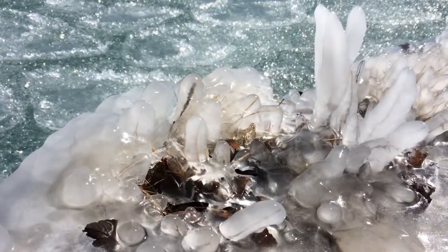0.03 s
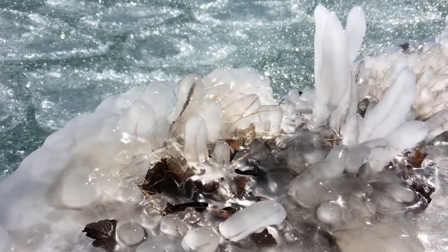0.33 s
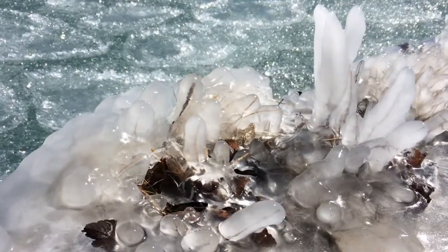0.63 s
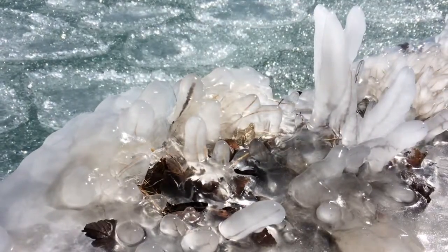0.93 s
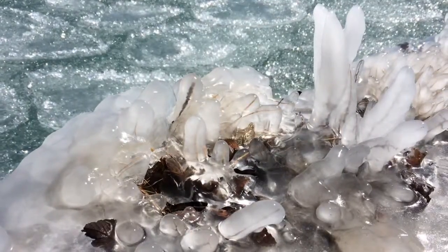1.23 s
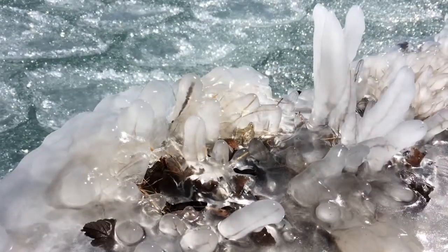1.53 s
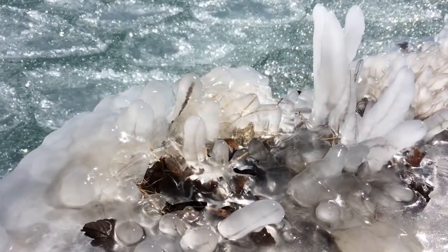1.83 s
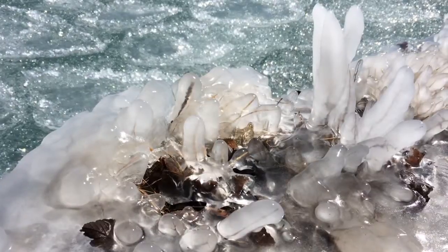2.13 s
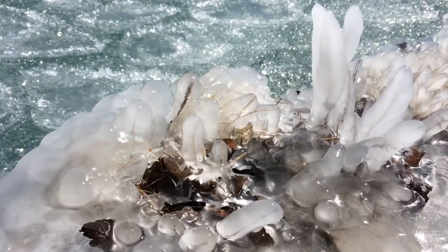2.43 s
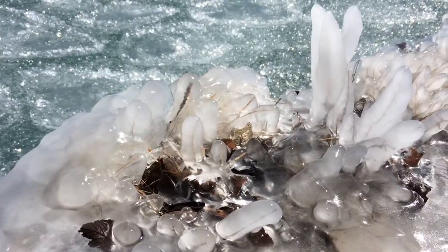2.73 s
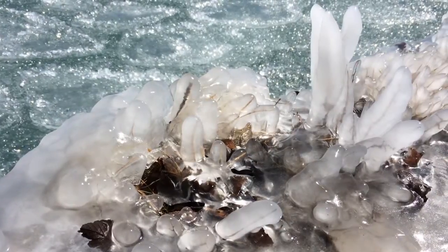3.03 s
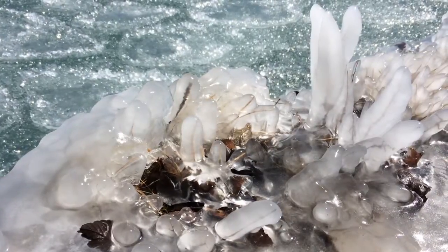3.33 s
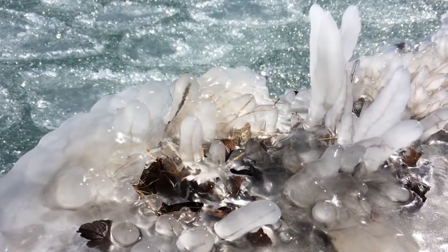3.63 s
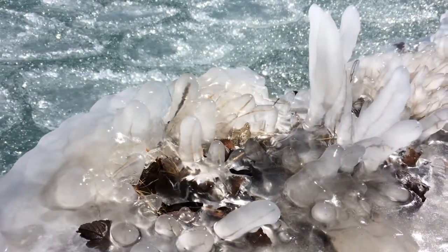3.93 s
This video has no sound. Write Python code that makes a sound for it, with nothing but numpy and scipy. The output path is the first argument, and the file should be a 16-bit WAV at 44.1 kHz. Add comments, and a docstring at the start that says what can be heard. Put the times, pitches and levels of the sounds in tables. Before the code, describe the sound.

A far-off engine hums across an icy lake, starting with a short exhaust rasp and sinking slightly as it weakens. Low wind rumble continues throughout, while slush by the shore hisses softly and ice splinters tick faintly.

```python
"""An icy lake shore. A distant engine drones: its periodic firing gives a harmonic series that sinks
as the engine slows. At first the firings ring the exhaust with a rasp; then the tones fade into low
rumble and the far roar of wind and open water. Small waves stir the floating ice, so a soft fizzing
hiss swells and ebbs while bubbles ping and splinters tick. One faint high whistle passes."""
import sys
import numpy as np
from scipy import signal
from scipy.fft import rfft, irfft
from scipy.io import wavfile
from scipy.ndimage import map_coordinates

SR = 44100
rng = np.random.default_rng(int(sys.argv[2]) if len(sys.argv) > 2 else 0)


def output_pcm(signal):
    """Save a mono or channel-first signal as 16-bit PCM at the path in sys.argv[1].

    Samples are clipped to [-1, 1] before scaling.
    """
    pcm = np.clip(np.atleast_2d(signal).T, -1, 1) * 32767
    wavfile.write(sys.argv[1], SR, np.round(pcm).astype(np.int16))


N = 176400

# Spectrum of far wind and open water: frequency_hz, relative_density_db
ROAR_SPECTRUM = [(200, -38), (450, -6), (660, -2), (780, -1), (950, -1.5), (1100, -4), (1550, -5),
                 (2000, -11), (2700, -19), (4000, -28), (8000, -37), (15000, -40.5)]
# Envelope of the hollow band in the roar: time_s, level_db
HOLLOW_ENVELOPE = [(0, -65.5), (1.2, -56), (1.55, -68), (1.85, -52.5), (2.15, -58.5), (2.5, -52),
                   (2.8, -72), (3.1, -69), (3.35, -61.5), (3.7, -54), (4, -62)]
# Spectrum of the deep rumble: frequency_hz, relative_density_db
RUMBLE_SPECTRUM = [(15, -37), (28, -11), (42, -12), (60, -0.5), (85, -1), (125, 1.5), (155, -5.5),
                   (210, -7.5), (290, -19), (400, -32.5), (650, -38.5)]
# Gusts of the rumble: time_s, level_db
RUMBLE_ENVELOPE = [(0, -35), (.25, -35), (.7, -36.5), (1.2, -36), (1.6, -37.5), (2.1, -37.5), (2.4, -33.5),
                   (2.58, -37.5), (2.75, -37.5), (2.9, -35.5), (3.05, -38), (3.4, -38), (3.85, -35.5),
                   (4, -40.5)]
# Spectrum of the murmur just above the rumble: frequency_hz, relative_density_db
MURMUR_SPECTRUM = [(130, -5), (200, -1), (280, 0.5), (400, -3), (520, -6.5), (650, -18), (900, -34)]
# Envelope of that murmur: time_s, level_db
MURMUR_ENVELOPE = [(0, -39), (.5, -46.5), (1.2, -46.5), (2, -45.5), (2.5, -45), (2.8, -47.5), (3.2, -42),
                   (3.6, -45), (3.8, -48.5), (4, -43)]
# Arch of the whistle: time_s, pitch_hz, level_db
WHISTLE_ARCH = [(.53, 8200, -83), (.6, 9400, -74), (.68, 9400, -74), (.76, 8550, -75), (.8, 8000, -90)]
# Spectrum of the wash in the floating ice: frequency_hz, relative_density_db
WASH_SPECTRUM = [(1500, -4), (3000, -4), (3700, -1), (4500, -5.5), (6000, -3), (8500, -6.5), (11000, -10.5),
                 (15000, -14)]
# Swell shared by fizz, hiss and bubbles: time_s, base_level_db
WASH_ENVELOPE = [(0, -73), (.55, -74.5), (.93, -68.5), (1, -66.5), (1.24, -64), (1.38, -66.5), (1.7, -67),
                 (1.9, -64), (2.12, -68), (2.45, -66), (2.65, -67), (2.9, -66), (3.25, -65.5), (3.45, -71),
                 (3.8, -71.5), (4, -68)]
# Contacts of ice splinters: start_s, peak_db, pitch_hz, width_hz, t60_s
ICE_CONTACTS = [(.1206, -61, 13300, 1500, .02), (.1635, -46.5, 10800, 8000, .007),
                (.7944, -59, 10200, 1200, .04), (1.1794, -55, 8500, 900, .03),
                (1.2955, -60, 9400, 1000, .03), (1.3423, -62, 12200, 1000, .03),
                (1.48, -52, 9840, 1600, 0.02), (1.5983, -58, 9900, 900, .04),
                (1.6297, -58, 10200, 1400, .02), (1.8178, -57, 10000, 1100, .03),
                (2.2164, -54, 9000, 4000, .02), (2.4174, -55, 6000, 2500, .025),
                (2.464, -51, 8700, 2800, .02), (2.8434, -53, 8700, 1300, 0.041)]
# Resonances of the exhaust pipe: frequency_hz, width_hz, gain_db
EXHAUST_MODES = [(485, 91, -5), (737, 140, -3.5), (838, 230, 5), (1135, 160, -7.5), (1530, 360, -23)]
# Envelope of the exhaust rasp: time_s, level_db
RASP_ENVELOPE = [(0, -43.5), (.06, -35.5), (.11, -40.5), (.2, -46.5), (.255, -45.5), (.29, -68), (1.1, -55),
                 (1.5, -68), (2, -60), (2.8, -70), (3.4, -56), (4, -77)]
# Levels of the four firing harmonics: time_s, first_db, second_db, third_db, fourth_db
HARMONIC_ENVELOPES = [(0, -32, -40.5, -42, -36), (.2, -34, -38.5, -41, -39), (.5, -35, -40.5, -49, -46.5),
                      (.75, -31.5, -41, -46, -44), (1.05, -45.5, -39.5, -44.5, -45.5),
                      (1.35, -39.5, -42.5, -47, -52), (1.65, -39, -48.5, -46.5, -51.5),
                      (2, -40.5, -63, -47, -51), (2.4, -41, -57, -48, -52), (2.9, -38.5, -58, -52.5, -58),
                      (3.2, -43.5, -61, -49.5, -58), (3.6, -39, -58, -54, -59), (4, -44, -57, -62.5, -56)]
# Weaker engine partials, the lowest beating with the fundamental: firing_rate_ratio, initial_level_db
WEAK_PARTIALS = [(.91, -42.5), (1.5, -47.5), (2.5, -57), (3.5, -56.5), (5, -64), (6, -67), (7, -60.5)]

TIME_S = np.arange(N) / SR


def undb(db):
    """Convert decibels to an amplitude ratio."""
    return 10 ** (np.asarray(db) / 20)


def unit(x):
    """Normalise to rms 1."""
    return x / np.sqrt(np.mean(x ** 2))


def curve(table, column=1):
    """Interpolate one column of a table linearly in time."""
    rows = np.array(table)
    return np.interp(TIME_S, rows[:, 0], rows[:, column])


def colour(x, spectrum):
    """Spectral shaping: weight each frequency by a table, then normalise to rms 1."""
    hz, db = np.array(spectrum).T
    bins_hz = np.maximum(np.fft.rfftfreq(N, 1 / SR), 1)
    gain_db = np.interp(np.log(bins_hz), np.log(hz), db, left=-90, right=-90)
    return unit(irfft(rfft(x) * undb(gain_db), N))


def resonate(x, hz, width_hz):
    """Resonance with steep skirts: two equal band-passes in cascade."""
    b, a = signal.iirpeak(min(hz, SR / 2 - 1000), hz / width_hz, fs=SR)
    return signal.lfilter(b, a, signal.lfilter(b, a, x))


def noise():
    """Gaussian white noise."""
    return rng.standard_normal(N)


def drift(knots_per_s):
    """Smooth random modulation with a spread near 1."""
    return map_coordinates(rng.standard_normal(2000), [TIME_S * knots_per_s], mode="mirror")


def far_roar(level_db=-52.5, sway_db=0.96, flicker_db=0.5):
    """Broadband noise of far wind and open water; a narrow, hollow band comes and goes."""
    hollow = unit(resonate(noise(), hz=878, width_hz=193))
    hollow *= undb(curve(HOLLOW_ENVELOPE) + flicker_db * drift(16))
    return colour(noise(), ROAR_SPECTRUM) * undb(level_db + sway_db * drift(5.33)) + hollow


def rumble(throb_db=0.03, sway_db=1.2):
    """Amplitude-modulated low noise: a deep band in soft gusts, and a murmur above it."""
    deep = colour(noise(), RUMBLE_SPECTRUM) * undb(curve(RUMBLE_ENVELOPE) + throb_db * drift(22))
    murmur = colour(noise(), MURMUR_SPECTRUM) * undb(curve(MURMUR_ENVELOPE) + sway_db * drift(14))
    return deep + murmur


def whistle(waver_hz=240):
    """Random frequency modulation roughens a thin arching tone, perhaps a far bird."""
    pitch_hz = curve(WHISTLE_ARCH) + waver_hz * drift(300)
    phase = 2 * np.pi * np.cumsum(pitch_hz) / SR
    sounding = (TIME_S > WHISTLE_ARCH[0][0]) & (TIME_S < WHISTLE_ARCH[-1][0])
    return np.sin(phase) * undb(curve(WHISTLE_ARCH, column=2)) * sounding


def wash(grains_per_s=970, spread_db=7.5, fizz_db=-7, hiss_db=-0.5, slosh_db=-65.5, flicker_db=1.34):
    """Shot noise: waves stir the slush into tiny random crackles, over a hiss and one lower slosh."""
    grains = (rng.random(N) < grains_per_s / SR) * rng.choice([-1, 1], N)
    grain_gain = undb(spread_db * np.minimum(rng.exponential(size=N), 4))
    fizz = undb(fizz_db) * colour(grains * grain_gain, WASH_SPECTRUM)
    hiss = undb(hiss_db) * colour(noise(), WASH_SPECTRUM)
    slosh = undb(slosh_db) * unit(resonate(noise(), hz=3500, width_hz=1350))
    slosh *= np.exp(-((TIME_S - 1.154) / 0.21) ** 2)  # a brief swell peaking at 1.154 s
    return ((fizz + hiss) * undb(curve(WASH_ENVELOPE)) + slosh) * undb(flicker_db * drift(29.93))


def bubbles(count=260, low_hz=3360, high_hz=10920, t60_s=0.032, rise_per_s=1.7,
            gain_db=-1, spread_db=3, tilt_db_per_octave=-2):
    """Damped oscillation: bubbles ping at random, rising in pitch, louder as the wash swells."""
    age_s = np.arange(2048) / SR
    decay = np.exp(-np.log(1000) * age_s / t60_s)
    out = np.zeros(N + len(age_s))
    for when, pitch, strength in rng.random((count, 3)):
        hz = low_hz * (high_hz / low_hz) ** pitch
        ping = np.sin(2 * np.pi * hz * age_s * (1 + rise_per_s * age_s / 2)) * decay
        strength_db = spread_db * min(-np.log(1 - strength), 3)
        tilt_db = tilt_db_per_octave * np.log2(hz / low_hz)
        start = int(when * N)
        out[start:start + len(age_s)] += ping * undb(strength_db + tilt_db)
    return out[:N] * undb(curve(WASH_ENVELOPE) + gain_db)


def ice_ticks():
    """Impact excitation: splinters of ice touch, and each short burst rings one resonance."""
    age_s = np.arange(4096) / SR
    out = np.zeros(N)
    for start_s, peak_db, pitch_hz, width_hz, t60_s in ICE_CONTACTS:
        burst = rng.standard_normal(len(age_s)) * np.exp(-np.log(1000) * age_s / t60_s)
        tick = resonate(burst, pitch_hz, width_hz)
        start = int(start_s * SR)
        out[start:start + len(age_s)] += undb(peak_db) * tick / np.abs(tick).max()
    return out


def exhaust_rasp(cycles, jitter_s=0.00026, scatter_db=2.5, gas_db=-6, puff_cycles=0.93, muffler_hz=1800):
    """Source and filter: uneven firings and their gas puffs ring the pipe; a muffler cuts the treble."""
    firings = np.flatnonzero(np.diff(np.floor(cycles)))
    timing, strength = rng.standard_normal((len(firings), 2)).T
    onsets = np.clip(firings + (jitter_s * SR * timing).astype(int), 0, N - 1)
    pulses = np.zeros(N)
    pulses[onsets] = undb(scatter_db * strength)
    puffs = noise() * np.exp(-(cycles % 1) / puff_cycles)
    excitation = unit(pulses) + undb(gas_db) * unit(puffs)
    pipe = sum(undb(db) * resonate(excitation, hz, width_hz) for hz, width_hz, db in EXHAUST_MODES)
    muffler = signal.butter(4, muffler_hz, fs=SR, output="sos")
    return unit(signal.sosfilt(muffler, pipe)) * undb(curve(RASP_ENVELOPE))


def engine_drone(cycles, wander_rad=0.08, fade_db_per_s=2.52):
    """Superposition: harmonics in step form a rounded pulse amid weaker, fading partials."""
    def partial(partial_cycles, flutter_db):
        """Moving air modulates the phase and amplitude of a tone."""
        phase = 2 * np.pi * partial_cycles + wander_rad * drift(18)
        return -np.sqrt(2) * np.cos(phase) * undb(flutter_db * drift(18))
    harmonics = sum(undb(curve(HARMONIC_ENVELOPES, column=k)) * partial(k * cycles, flutter_db=1.22)
                    for k in range(1, 5))
    weak = sum(undb(db) * partial(ratio * cycles + rng.random(), flutter_db=2.5)
               for ratio, db in WEAK_PARTIALS)
    return harmonics + weak * undb(-fade_db_per_s * TIME_S)


def scene(firing_hz=118.18, sag_hz_per_s=1.03, sag_hz_per_s2=0.1):
    """Sound pressures add, in mono; one falling firing rate drives both rasp and drone."""
    cycles = np.cumsum(firing_hz - sag_hz_per_s * TIME_S - sag_hz_per_s2 * TIME_S ** 2) / SR
    background = far_roar() + rumble() + whistle()
    shore = wash() + bubbles() + ice_ticks()
    engine = exhaust_rasp(cycles) + engine_drone(cycles)
    return (background + shore + engine)[None]


def record(dry, fade_in_s=0.002, cutoff_hz=15450):
    """Band limiting: a steep low-pass cuts the top, and a short fade-in prevents a click."""
    fade_in = np.sin(np.pi / 2 * np.minimum(TIME_S / fade_in_s, 1)) ** 2
    low_pass = signal.ellip(12, .1, 80, cutoff_hz, fs=SR, output="sos")
    return signal.sosfilt(low_pass, dry * fade_in)


dry = scene()
out = record(dry)
output_pcm(out)
```